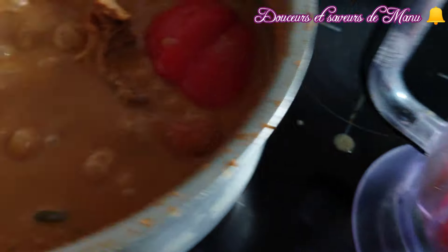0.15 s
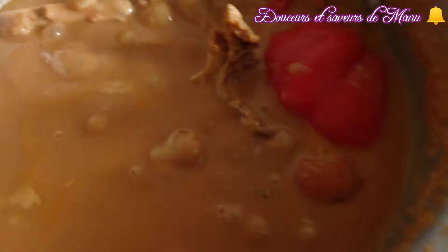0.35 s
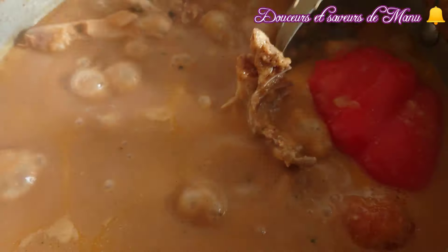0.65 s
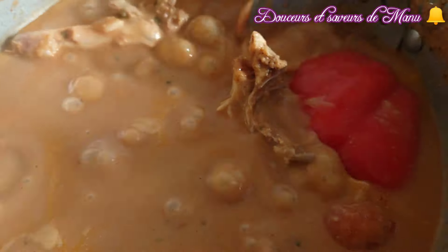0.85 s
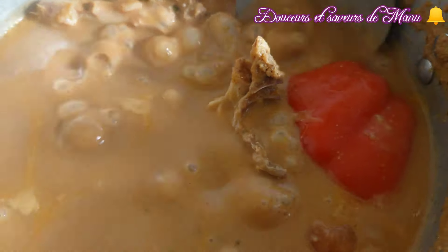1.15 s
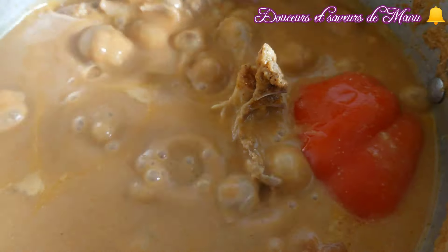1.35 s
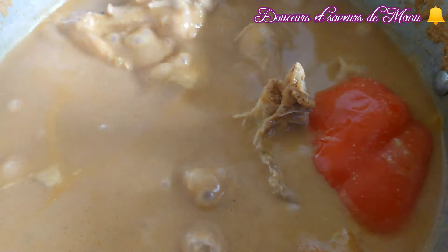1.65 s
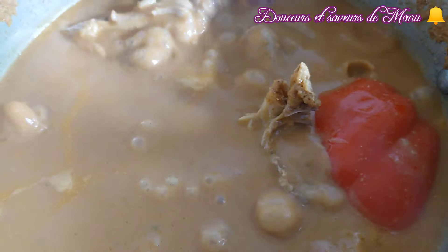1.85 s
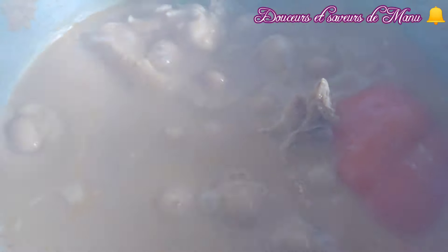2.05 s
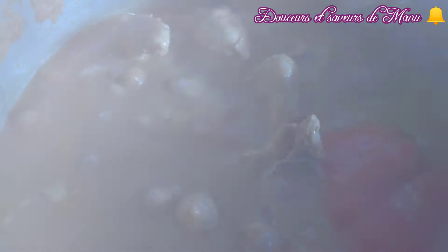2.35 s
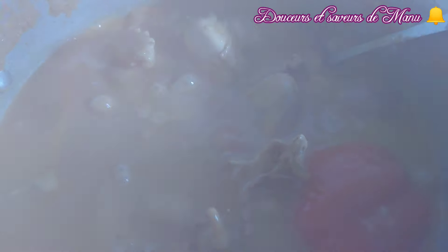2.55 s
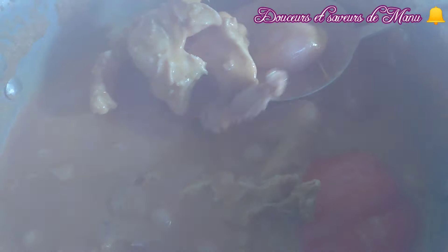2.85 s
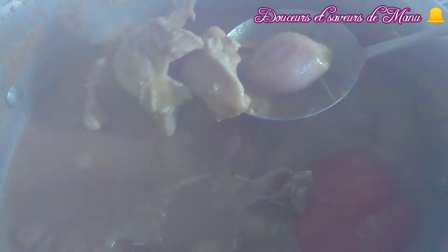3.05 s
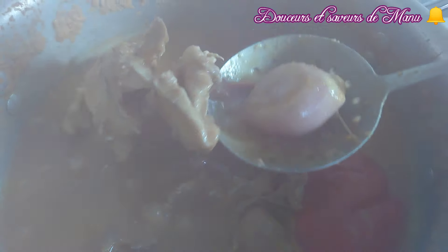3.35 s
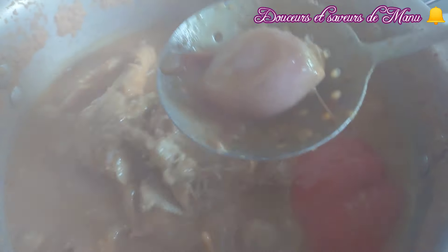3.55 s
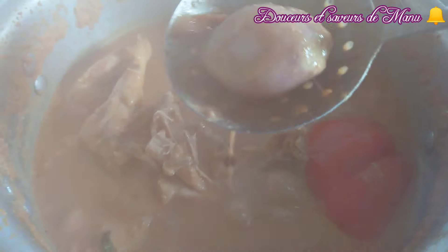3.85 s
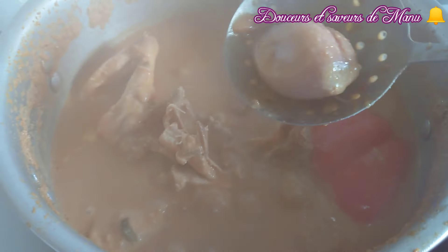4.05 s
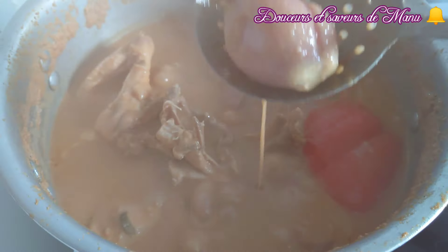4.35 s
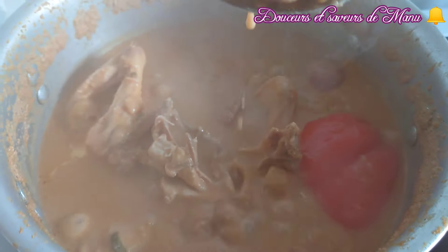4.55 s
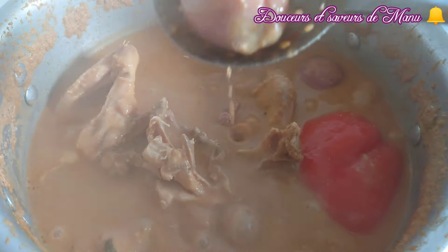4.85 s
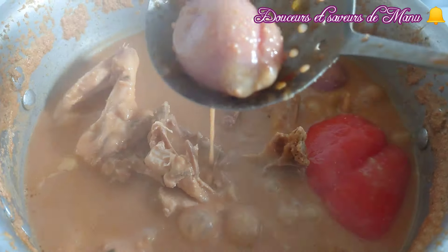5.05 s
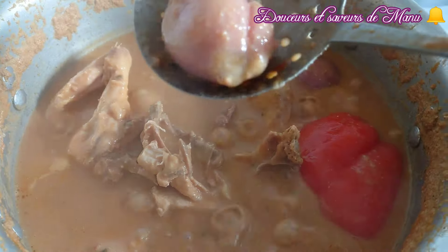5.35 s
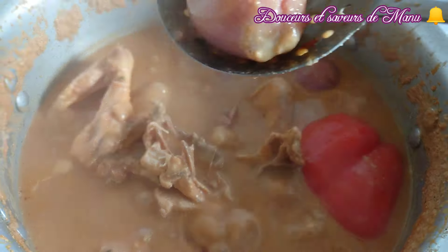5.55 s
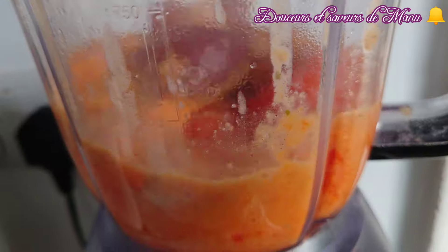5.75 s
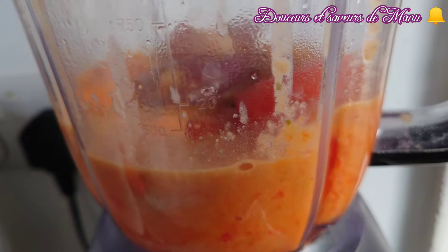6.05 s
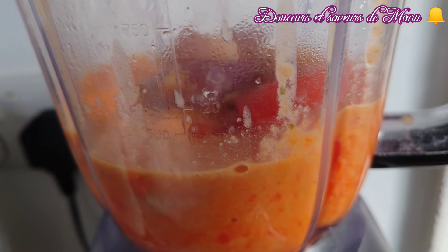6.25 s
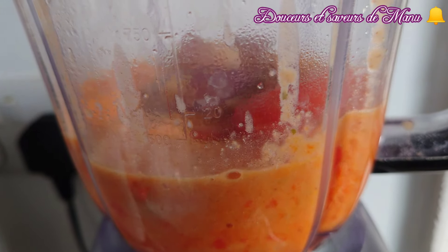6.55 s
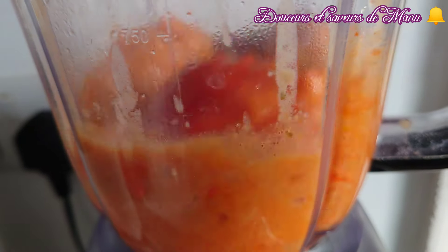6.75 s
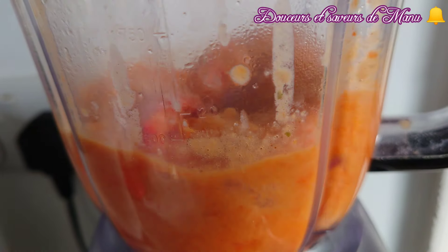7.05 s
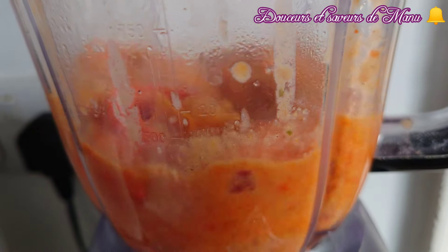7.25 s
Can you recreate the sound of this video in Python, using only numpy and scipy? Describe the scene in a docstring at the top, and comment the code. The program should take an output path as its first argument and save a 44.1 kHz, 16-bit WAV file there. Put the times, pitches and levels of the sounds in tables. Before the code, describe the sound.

A spoon clanks on a metal pot of quietly bubbling stew, drips fall, sudden silence, then a blender bursts in with a loud, straining whine.

```python
"""A spoon knocks and scrapes a metal pot of thick stew: struck, the pot rings in its damped modes.
Bubbles burst, and late on drips fall from the spoon, as short tones of rising pitch over a simmering hiss;
dull thuds, puffs of sauce or steam and a diffuse room tail join them.
Low hums from outside, sines gliding in pitch, drift over a rumble of shaped noise.
The stew stops dead; after a short silence a blender runs: shaft, blades and commutator sound at multiples
of the turn rate over noise from churning pulp, and chunks that meet the blades pull the speed down."""
import sys
import numpy as np
from scipy import signal
from scipy.fft import rfft, irfft
from scipy.io import wavfile

SR = 44100
rng = np.random.default_rng(int(sys.argv[2]) if len(sys.argv) > 2 else 0)


def waveform_to_disk(signal):
    """Save audio, clipped to [-1, 1], as 16-bit WAV at the path in sys.argv[1]."""
    frames = np.transpose(np.atleast_2d(signal))
    scaled = np.clip(frames, -1, 1) * 32767
    samples = np.round(scaled).astype(np.int16)
    wavfile.write(sys.argv[1], SR, samples)


N = 326340

# vibration modes of the metal pot: f/Hz, level/dB, time to fall by 60 dB/s
POT_MODES = [(1015, 1, .11), (1345, -5, .07), (1610, -7, .06), (1710, -3, .04), (1880, -3, .03),
             (2050, -7, .035), (2600, -3, .045), (2800, -4, .035), (3200, -8, .03), (3950, -7, .03),
             (4160, -9, .03), (4700, -17, .025), (5700, -6, .025), (5950, -6, .025), (6800, -12, .02),
             (7450, -9, .02), (9300, -10, .015)]
# end of the stew, start of the blender: t/s, t/s
SILENCE_S = (5.3228, 5.772)


def amp(db):
    """Decibel law: a level in dB becomes an amplitude ratio."""
    return 10 ** (np.asarray(db) / 20)


def rms_one(x):
    """Normalisation: scale to a root-mean-square value of 1."""
    return x / np.sqrt(np.mean(x ** 2) + 1e-20)


def in_time(rows):
    """Linear interpolation: the columns of a time table, sample by sample."""
    s, *columns = np.transpose(rows)
    return [np.interp(np.arange(N) / SR, s, column) for column in columns]


def at_hz(points, hz):
    """Spectral interpolation: read a frequency table on a logarithmic axis."""
    table_hz, values = np.array(points).T
    return np.interp(np.log(hz), np.log(table_hz), values)


def drift(rate):
    """Low-pass random process: noise through a double pole at rate Hz, of rms 1."""
    # computed at every 20th sample, then interpolated
    r = np.exp(-40 * np.pi * rate / SR)
    noise = rng.standard_normal(N // 20 + 2002)
    slow = signal.lfilter([1], [1, -2 * r, r * r], noise)[2000:]
    return np.interp(np.arange(N) / 20, np.arange(len(slow)), rms_one(slow))


def ring(clicks, hz, t60):
    """Damped resonator: a unit click sets off a decaying sine of initial height 1."""
    r, w = amp(-60 / (t60 * SR)), 2 * np.pi * hz / SR
    return signal.lfilter([0, np.sin(w)], [1, -2 * r * np.cos(w), r * r], clicks + 1e-18)


def coloured(spectrum, resonances=()):
    """Spectral shaping and partial coherence: stereo noise, alike in the bass, of rms 1."""
    # likeness of the two sides: f/Hz, correlation
    likeness = [(60, 1), (180, 0.79), (550, 0.78), (1650, 0.13), (4970, 0.12), (15000, 0.12)]
    # balance of the two sides: f/Hz, left minus right level/dB
    lean = [(60, 2), (180, -1.5), (1200, 1.5), (2400, 0), (4970, 2), (8100, -5.5), (15000, -1)]
    lag_s, lag_from_hz = .00035, 1800   # the treble reaches the left side later
    hz = np.maximum(np.fft.rfftfreq(N, 1 / SR), 1)
    gain = amp(at_hz(spectrum, hz))
    for peak_hz, width, db in resonances:
        gain = gain + amp(db) / (1 + (2 * (hz - peak_hz) / width) ** 2)
    mid, side = rfft(rng.standard_normal((2, N)))
    alike = np.clip(at_hz(likeness, hz), -1, 1)
    both = np.sqrt(1 + alike) * mid + np.sqrt(1 - alike) * side * [[1], [-1]]
    late = np.exp(-1j * np.pi * lag_s * np.maximum(hz - lag_from_hz, 0) * [[1], [-1]])
    balance = amp(at_hz(lean, hz) * [[.5], [-.5]])
    return rms_one(irfft(both * late * gain * balance, N))


def add(out, s, sound, pan_db):
    """Superposition: add a sound at s seconds, pan_db louder on the left than on the right."""
    i = int(s * SR)
    out[:, i:i + len(sound)] += sound[:N - i] * amp([[pan_db / 2], [-pan_db / 2]])


def spoon():
    """Modal impact: a knock gives a short clack, rings the pot's low modes and ticks in the high ones."""
    # spoon on the pot: t/s, clack level/dB, clack f/Hz, tick level/dB, left minus right level/dB,
    # share of the free ring time left by the hand and the stew
    knocks = [(.004, -42.5, 1580, -54, 24, .5), (0.7551, -17, 1380, -17.5, -7, .6),
              (0.876, -31.5, 2580, -42.5, -7, .4), (1.0219, -8, 1970, -29.5, 2.5, .9),
              (2.139, -36.5, 840, -34, -1, .3), (2.318, -23.5, 1640, -31, -6, .4),
              (2.707, -25.5, 1550, -21.5, -11.5, .25), (2.7547, -15.5, 1763, -10, -7, .25),
              (3.67, -36, 1320, -34.5, -8, .3)]
    tick_from_hz = 5000   # modes above this answer to the tick
    clack_band = signal.butter(2, [700, 6000], "band", fs=SR, output="sos")
    tick_band = signal.butter(1, [3000, 15000], "band", fs=SR, output="sos")
    out, t = np.zeros((2, N)), np.arange(SR // 2) / SR
    click = (t == 0) * 1.
    for s, clack_db, clack_hz, tick_db, pan_db, free in knocks:
        # the spoon chatters on contact
        chatter = rng.standard_normal(len(t)) * amp(-60 * t / 0.01) * np.minimum(t / 0.001, 1)
        blow = click + .09 * chatter
        low_modes, high_modes = 0, 0
        for k, (hz, db, t60) in enumerate(POT_MODES):
            mode = (-1) ** k * amp(db + rng.normal(0, 1.5)) * ring(blow, hz, free * t60)
            if hz < tick_from_hz:
                # modes lose 3.5 dB per octave away from the clack
                low_modes = low_modes + amp(-3.5 * abs(np.log2(hz / clack_hz))) * mode
            elif hz > tick_from_hz:
                high_modes = high_modes + mode
        clack = ring(click, clack_hz, 0.007) + 0.3 * low_modes
        clack = signal.sosfilt(clack_band, clack)
        tick_noise = signal.sosfilt(tick_band, rng.standard_normal(len(t)))
        tick_noise = amp(-60 * t / 0.018) * np.minimum(t / 0.002, 1) * tick_noise
        tick = .6 * tick_noise + .4 * high_modes
        add(out, s, amp(clack_db) * clack + amp(tick_db) * tick, pan_db)
    return out


def scrapes_and_puffs():
    """Friction and flow noise: grit rings the pot's modes under swishing sauce; puffs are all but swish."""
    # spoon dragged along the pot; the last two are puffs of sauce or steam, their metal too faint to hear:
    # t/s, length/s, metal level/dB, favoured modes f/Hz, swish level/dB
    strokes_and_puffs = [(0, 0.04, -55, 1730, -47.5), (0.684, 0.07, -73, 4000, -58),
                         (0.76, 0.44, -58.5, 2540, -57), (1.992, 0.15, -52.5, 1240, -56),
                         (2.236, 0.13, -54, 1010, -53.5), (2.382, 0.063, -59, 2620, -65),
                         (2.527, 0.09, -58, 1120, -54.5), (2.81, 0.096, -50.5, 2840, -54),
                         (4.268, 0.12, -76, 2664, -57), (4.59, 0.19, -84, 1117, -62)]
    # spectrum of the swish: f/Hz, relative level per Hz/dB
    swish_spectrum = [(880, -44), (1500, -22), (4000, -10), (6760, -9), (8160, -18.5), (14200, -18.5),
                      (16000, -14.5)]
    grit_per_s = 4000
    t, out = np.arange(N) / SR, 0
    grit = rng.standard_normal((2, N)) * (rng.random(N) < grit_per_s / SR) * amp(2.5 * drift(60))
    modes = [(hz, rms_one(ring(grit, hz, 0.46 * t60))) for hz, db, t60 in POT_MODES]
    swish = amp(2.5 * drift(45)) * coloured(swish_spectrum)
    for s, length, metal_db, favoured_hz, swish_db in strokes_and_puffs:
        envelope = np.sin(np.pi * np.clip((t - s) / length, 0, 1)) ** 1.2
        # modes lose 11 dB per octave away from the favoured frequency
        metal = sum(amp(-11 * abs(np.log2(hz / favoured_hz))) * rung for hz, rung in modes)
        metal = metal * amp([[-2.5], [2.5]])   # the metal lies to the right
        out = out + envelope * (amp(metal_db) * metal + amp(swish_db) * swish)
    return out


def thuds():
    """Damped oscillation: a low tone sagging in pitch, with a clatter of noise about an octave wide."""
    # dull bumps of the pot on the hob: t/s, level/dB, f/Hz
    bumps = [(0.7547, -27.5, 157), (0.8775, -36.5, 155), (1.0232, -42, 233), (2.318, -33.5, 260),
             (2.329, -36.5, 150), (2.7536, -29, 178), (2.768, -18.5, 423.6), (2.79, -26, 221),
             (2.839, -31.5, 218)]
    t60_s, sag_per_s, pan_db = 0.077, 1.2, 0   # the pitch sags at twice this rate
    out, t = np.zeros((2, N)), np.arange(SR // 4) / SR
    for s, db, hz in bumps:
        tone = np.sin(2 * np.pi * hz * t * (1 - sag_per_s * t))
        clatter = rms_one(ring(rng.standard_normal(len(t)), 1.2 * hz, 1.7 / hz))
        envelope = amp(db - 60 * t / t60_s) * np.minimum(t / 0.0013, 1)
        add(out, s, envelope * (tone + 0.49 * clatter), pan_db)
    return out


def bubbles_and_drips():
    """Size scaling of bubbles: high-pitched ones ring briefly, drips alike; faint bursts join at random."""
    # the louder bubbles bursting, and from 4.89 s high drips from the spoon: t/s, level/dB, f/Hz
    plops_and_drips = [(0.602, -48.5, 4710), (0.62, -43.5, 710), (0.636, -45, 910), (0.92, -39.5, 580),
                       (0.973, -43, 720), (1.16, -46, 595), (1.178, -52.5, 3960), (1.263, -49, 590),
                       (1.381, -50, 5750), (1.443, -46.5, 850), (1.651, -47, 690), (1.709, -52, 2500),
                       (1.753, -46, 1040), (1.797, -49, 585), (1.875, -34.5, 925), (1.9117, -52.5, 3140),
                       (1.999, -40, 720), (2.103, -37, 960), (2.394, -44, 2540), (2.491, -43, 1050),
                       (2.619, -47, 915), (2.633, -32.5, 660), (2.644, -39.5, 850), (2.928, -44.5, 633),
                       (2.953, -40.5, 740), (3.062, -53, 6600), (3.107, -34, 630), (3.444, -49.5, 570),
                       (3.668, -39, 684), (3.869, -53, 4040), (3.93, -50, 690), (3.9407, -57, 4970),
                       (3.978, -48.5, 281), (4.133, -51.5, 5300), (4.229, -47.5, 560), (4.255, -43.5, 1170),
                       (4.52, -47.5, 875), (4.603, -50, 1110), (4.646, -51, 293), (4.707, -54, 1130),
                       (4.845, -39.5, 480), (4.8897, -52, 3770), (5.0094, -55, 3660), (5.05, -58, 3900),
                       (5.069, -54, 586), (5.165, -60, 3800), (5.207, -63, 4000), (5.248, -46.5, 580),
                       (5.3162, -55, 4170)]
    burst_cycles, burst_rise = 28, 0.12   # ring length and rise setting at 750 Hz
    size_law = 0.49                       # both shrink as pitch to this power
    high_pan_db = -4.5                    # per octave above 750 Hz: higher sounds lie further right
    faint_per_s, faint_db = 2.5, -53
    out, t = np.zeros((2, N)), np.arange(SR // 8) / SR
    faint = []
    for s, db, hz, keep in rng.random((60, 4)):
        if keep < faint_per_s * N / SR / 60:
            faint.append((s * N / SR, faint_db + 6 * (db - .5), 400 * 4 ** hz))
    for s, db, hz in plops_and_drips + faint:
        small = hz / 750
        shrink = small ** size_law
        sound = burst(t, hz, t60=burst_cycles / 750 / shrink, rise=burst_rise / shrink, breath=0.69)
        pan_db = high_pan_db * max(np.log2(small), 0) + rng.normal(0, 2)
        add(out, s, amp(db) * sound, pan_db)
    return out


def burst(t, hz, t60, rise, breath):
    """Cavity resonance: a bubble or drip is a damped tone of rising pitch with some splash noise."""
    # the pitch climbs by twice the rise within t60, as a bubble's cavity opens
    tone = np.sin(2 * np.pi * hz * t * (1 + rise * t / t60))
    splash = rms_one(ring(rng.standard_normal(len(t)), hz, 7.8 / hz))
    return amp(-60 * t / t60) * (1 - np.exp(-t * hz * 26.0)) * (tone + breath * splash)


def blender():
    """Rotating-machine orders: motor tones follow the shaft; churned pulp throbs with every turn."""
    # blender levels: t/s, shaft level/dB, churn level/dB, blade and commutator level/dB
    levels = [(5.79, -25.5, -20, -9.5), (5.88, -30, -19.5, -14), (5.93, -36, -19, -7),
              (5.99, -24.5, -17.5, -12.5), (6.2, -23.5, -18.5, -9.5), (6.74, -26, -17.5, -11),
              (6.88, -40, -19.5, -14.5), (6.955, -22, -17.5, -10), (7.01, -30.5, -20, -15.5),
              (7.145, -23.5, -17, -16), (7.21, -34.5, -20, -12), (7.3, -32, -15, -19),
              (7.4, -32, -20, -6.5)]
    # shaft tones: multiple of the turn rate, relative level/dB
    shaft_orders = [(1, -1), (2, -14), (3, -9)]
    # tones of the four blades: multiple of the turn rate, relative level/dB
    blade_orders = [(4, -19), (8, -28)]
    # brushes on the commutator segments: multiple of the turn rate, relative level/dB
    commutator_orders = [(24, -27.5), (36, -39), (48, -29), (60, -37), (72, -31)]
    # spectra of churned pulp, spray and chunks striking the blades: f/Hz, relative level per Hz/dB
    churn_spectrum, spray_spectrum, thump_spectrum = [(40, -92), (80, -100), (140, -15), (350, -7),
                                                      (900, -4.5), (1310, -7), (1900, 0.5), (3170, -8),
                                                      (3500, -10), (4550, -28.5)], [(1470, -77), (2500, -24),
                                                                     (3270, -21.5), (3590, -8), (4000, -13),
                                                                     (5390, -14), (6240, -16.5),
                                                                     (7280, -18.5), (8620, -26.5),
                                                                     (10400, -18.5), (12100, -24.5),
                                                                     (15650, -18), (15850, -45)], [(40, 0), (80, 12),
                                                                                    (200, 8), (500, 21),
                                                                                    (800, 17), (1300, -20)]
    # resonances of the jar: f/Hz, width/Hz, level/dB
    jar = [(241, 78.5, 1.5), (605, 14, -4.5), (840, 155, -6.5), (1146, 84, -3.5), (1714, 150, 3),
           (2530, 150, -10)]
    spray_db = -22   # where the churning is loudest
    thump_db = -83   # for each turn per s squared of braking
    braking, speed = shaft()
    shaft_db, churn_db, whine_db = in_time(levels)
    # lumps of pulp shake the speed, chunks more so
    shake = (.005 + braking / 15000) * drift(70)
    turns = np.cumsum(speed * (1 + shake)) / SR
    motor = amp(shaft_db) * tones(turns, shaft_orders, wobble_db=1.8, rate=15, spread=.25)
    motor += amp(whine_db) * tones(turns, blade_orders, wobble_db=2.4, rate=12, spread=.6)
    motor += amp(whine_db) * tones(turns, commutator_orders, wobble_db=2.5, rate=35, spread=0.62)
    throb = 1 + 0.038 * np.cos(2 * np.pi * turns)
    churn = amp(churn_db + 1.22 * drift(22.4)) * coloured(churn_spectrum, jar)
    spray_level = spray_db + 1.09 * (churn_db - churn_db.max()) + 0.98 * drift(44)
    spray = amp(spray_level) * coloured(spray_spectrum)
    thumps = braking * amp(thump_db + 2.5 * drift(30)) * coloured(thump_spectrum)
    # a small jar radiates no deep bass
    pulp = signal.sosfilt(signal.butter(2, 90, "high", fs=SR, output="sos"), churn + spray)
    return motor + throb * pulp + thumps


def shaft():
    """Rotor dynamics: the speed relaxes towards free running and each chunk's braking pulls it down."""
    # chunks meeting the blades: t/s, length/s, braking/(turns per s squared)
    chunks = [(5.784, .11, 120), (6.71, 0.14, 272), (7.082, .055, 320), (7.33, 0.083, 58)]
    start_hz, free_hz = 207.3, 231.5   # shaft turns per s at the start and unloaded
    recover_s = .45                    # time constant of picking up again
    t = np.arange(N) / SR
    braking = 0
    for s, length, brake in chunks:
        braking = braking + brake * np.clip(np.minimum(t - s, s + length - t) / 0.0091 + .5, 0, 1)
    lost = signal.lfilter([1 / SR], [1, -np.exp(-1 / (recover_s * SR))], braking)
    run_up = np.exp(-np.maximum(t - SILENCE_S[1], 0) / recover_s)
    return braking, free_hz - lost - (free_hz - start_hz) * run_up


def tones(turns, orders, wobble_db, rate, spread):
    """Harmonic synthesis: sines locked to the turns waver in level, out of step on the two sides."""
    out = 0
    for k, db in orders:
        phase = 2 * np.pi * k * turns + rng.normal(0, spread, (2, 1))
        out = out + np.sqrt(2) * amp(db + wobble_db * drift(rate)) * np.sin(phase)
    return out


def simmer():
    """Noise from many small sources: a wavering shaped hiss with the fizz of tiny bubbles."""
    # hiss and fizz: t/s, level/dB
    level = [(0, -64.5), (1.8, -61.5), (2.8, -56.5), (3.2, -64), (5.3, -65)]
    # spectrum of the hiss: f/Hz, relative level per Hz/dB
    hiss_spectrum = [(88, -25), (150, -6.5), (182, -2.5), (422, -9.5), (589, -6.5), (941, -10), (2760, -17),
                     (4410, -13.5), (8070, -27), (16000, -25.5)]
    level_db, = in_time(level)
    hiss = amp(0.61 * drift(25)) * coloured(hiss_spectrum)
    return amp(level_db) * (hiss + amp(-2) * fizz())


def fizz():
    """Random impulse process: tiny bubbles at random moments ring sixteen pitches, of rms 1."""
    fizz_per_s = 200
    out = np.zeros((2, N))
    sizes = amp(4.5 * np.minimum(rng.exponential(1, N), 3)) * (rng.random(N) < fizz_per_s / SR)
    dealt = rng.integers(0, 16, N)   # which pitch each bubble gets
    for k, hz in enumerate(np.geomspace(550, 12000, 16)):
        burst_once = ring(sizes * (dealt == k), hz, 10 / hz)   # about ten cycles
        softened = ring(burst_once, hz, 5 / hz)                # ringing twice softens the onset
        out += softened * (hz / 1000) ** 0.83 * amp(rng.normal(0, 2.5, (2, 1)))
    return rms_one(out)


def hums():
    """Frequency modulation: low tones, unsteady in level and pitch, over a rumble of shaped noise."""
    # hums from outside that swell, glide and fade: t/s, length/s, level/dB, start f/Hz, end f/Hz
    glides = [(-.2, 1.4, -56, 61, 72.3), (1.2, 0.78, -56, 66, 62), (2.001, 2.63, -54.5, 59, 73.7),
              (2.906, 1.5, -75, 105, 134.5), (4.504, 1.17, -61, 64, 68.9), (1.9, 3, -61.5, 49, 44.23),
              (4.001, 1.47, -53.5, 47, 42.45)]
    # rumble: t/s, level/dB
    rumble_level = [(0, -61.5), (1.8, -59), (2.8, -51), (3.8, -56), (4.2, -53.5), (4.8, -60), (5.3, -64)]
    # spectrum of the rumble: f/Hz, relative level per Hz/dB
    rumble_spectrum = [(20, -8.5), (50, 2.5), (125, -3), (175, -29.5), (320, -49)]
    t, out = np.arange(N) / SR, 0
    for s, length, db, from_hz, to_hz in glides:
        along = np.clip((t - s) / length, 0, 1)
        pitch = from_hz + (to_hz - from_hz) * along + 4.1 * drift(2.1)
        swell = np.sin(np.pi * along) ** 1.6 * amp(db + 0.68 * drift(3.8))
        out = out + swell * np.sqrt(2) * np.sin(2 * np.pi * np.cumsum(pitch) / SR)
    rumble_db, = in_time(rumble_level)
    return out + amp(rumble_db + 1.1 * drift(12)) * coloured(rumble_spectrum)


def room(x):
    """Diffuse reverberation: a decaying noise tail, its own on each side, with softened treble."""
    t60_s, room_db = 0.23, -9.5
    t = np.arange(SR // 2) / SR
    tail = rng.standard_normal((2, len(t))) * amp(-60 * t / t60_s) * (t > .004)
    tail = signal.lfilter([.6], [1, -.4], tail)
    tail = tail / np.sqrt(np.sum(tail ** 2) / 2)
    return amp(room_db) * signal.fftconvolve(x, tail, axes=1)[:, :N]


def stew():
    """Superposition: the near sounds of the pot with their room tail, over simmer and hums."""
    pan_db = -2.5   # simmer and hums lean to the right
    near = spoon() + thuds() + scrapes_and_puffs() + bubbles_and_drips()
    return near + room(near) + (hums() + simmer()) * amp([[pan_db / 2], [-pan_db / 2]])


def scene():
    """Gating in time: the stew stops dead; after the silence the blender swells in within 10 ms."""
    t = np.arange(N) / SR
    swell_in = np.clip((t - SILENCE_S[1]) / 0.01, 0, 1) ** 2
    return stew() * (t < SILENCE_S[0]) + blender() * swell_in


def record(dry):
    """Low-pass filtering: the top is cut steeply at 16080 Hz."""
    return signal.sosfilt(signal.cheby2(20, 70, 16080, fs=SR, output="sos"), dry)


dry = scene()
out = record(dry)
waveform_to_disk(out)
```